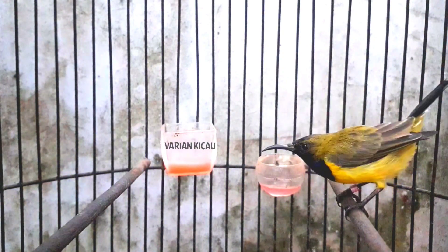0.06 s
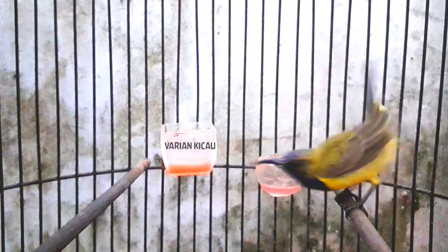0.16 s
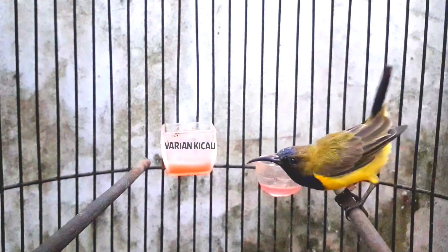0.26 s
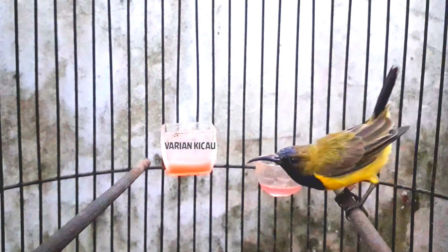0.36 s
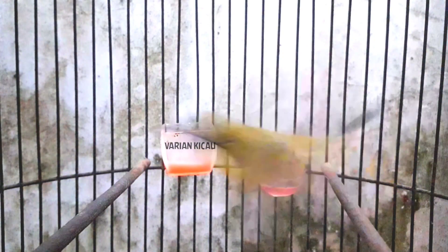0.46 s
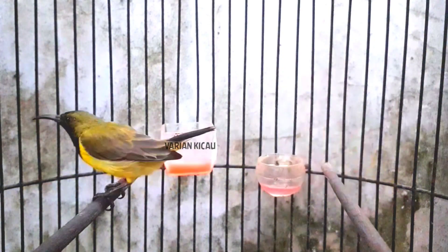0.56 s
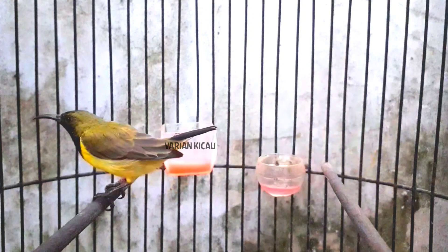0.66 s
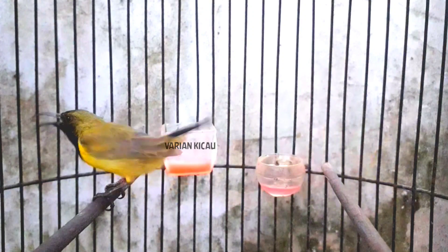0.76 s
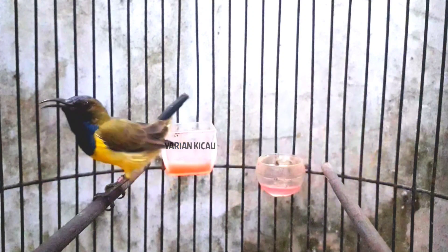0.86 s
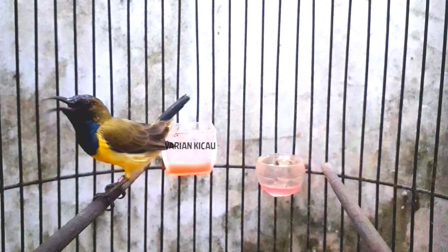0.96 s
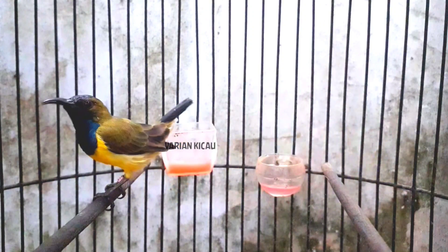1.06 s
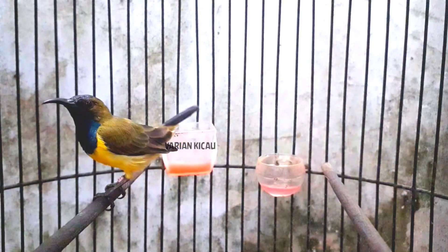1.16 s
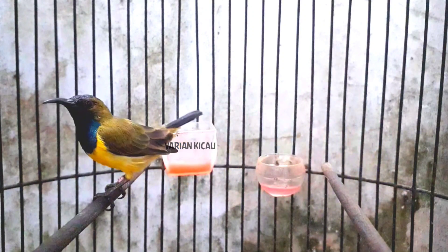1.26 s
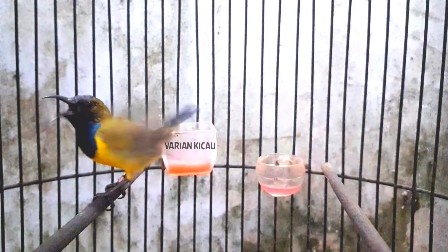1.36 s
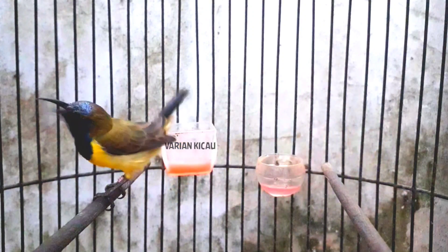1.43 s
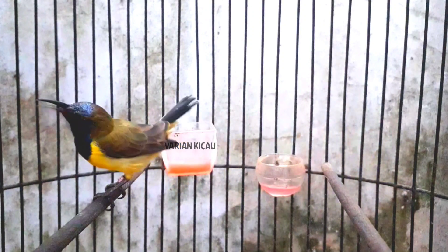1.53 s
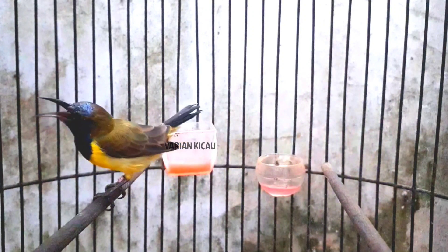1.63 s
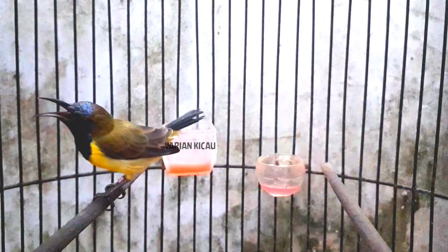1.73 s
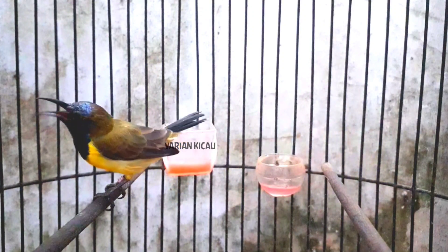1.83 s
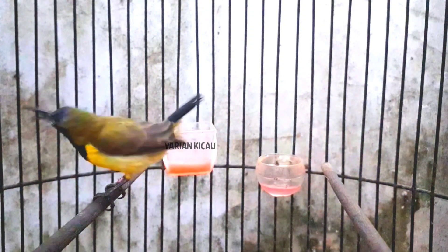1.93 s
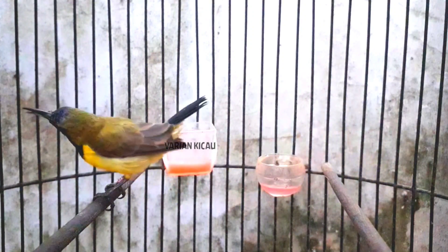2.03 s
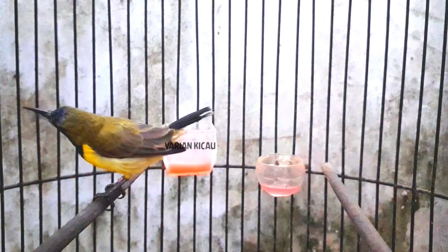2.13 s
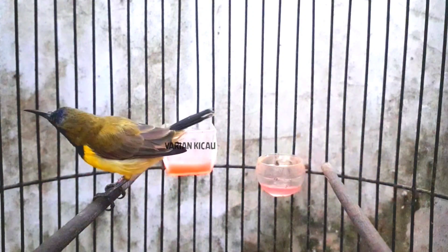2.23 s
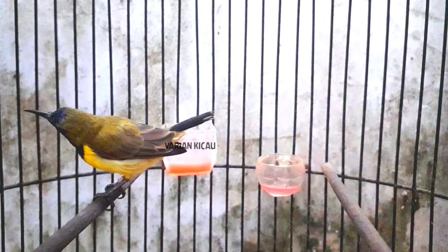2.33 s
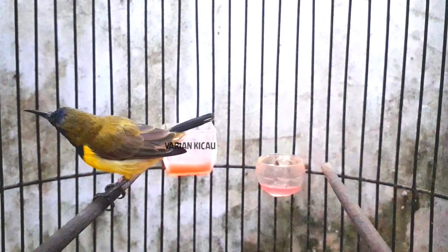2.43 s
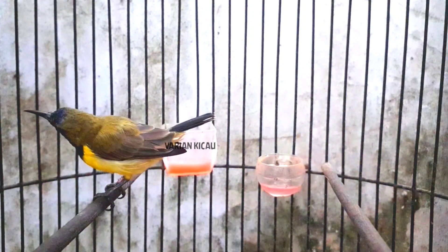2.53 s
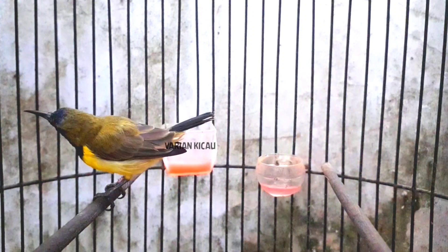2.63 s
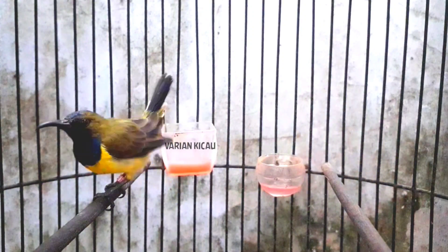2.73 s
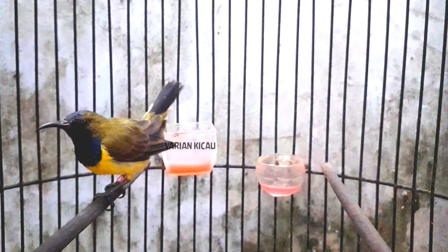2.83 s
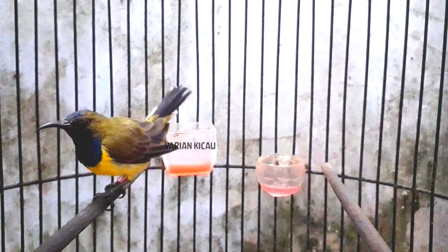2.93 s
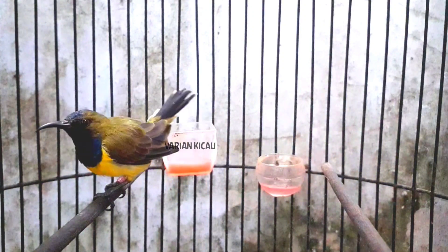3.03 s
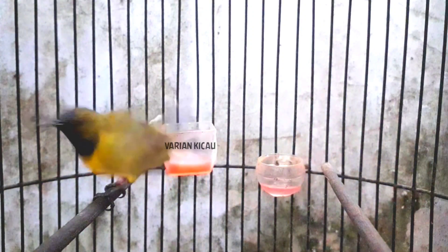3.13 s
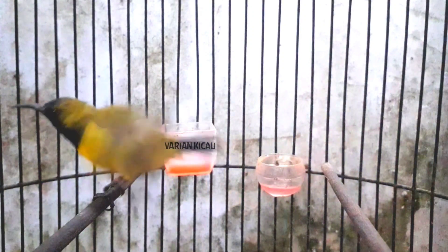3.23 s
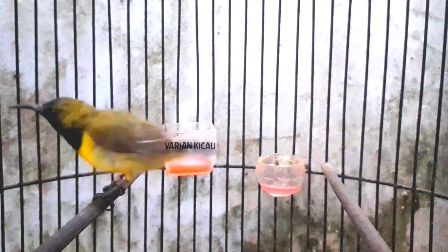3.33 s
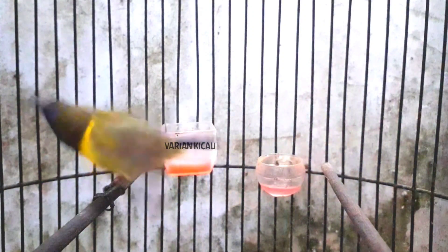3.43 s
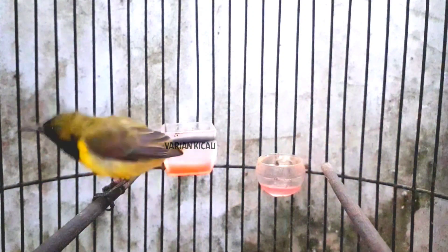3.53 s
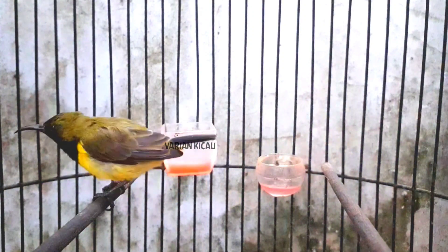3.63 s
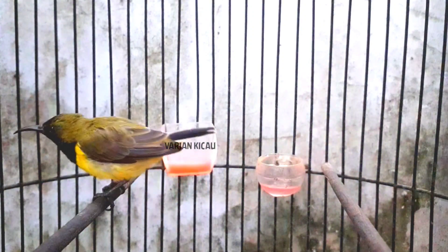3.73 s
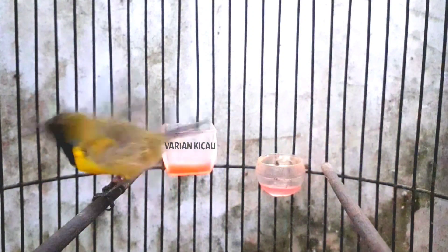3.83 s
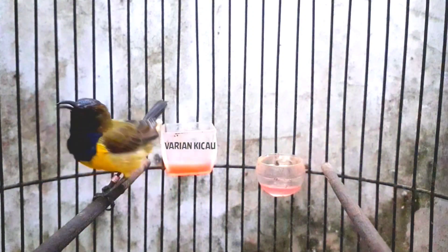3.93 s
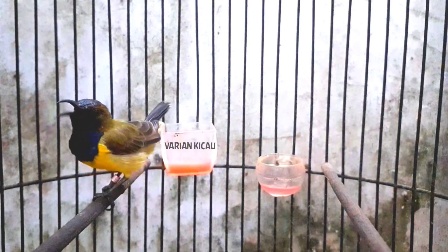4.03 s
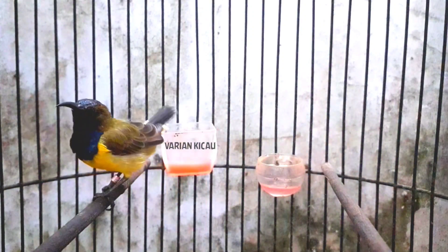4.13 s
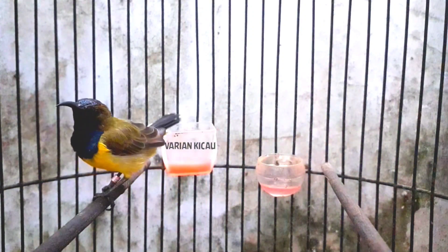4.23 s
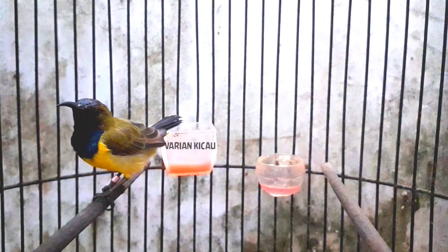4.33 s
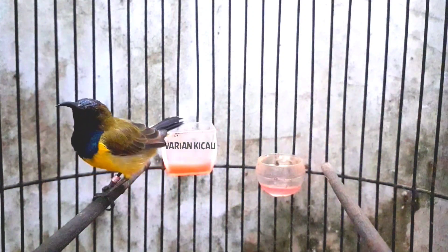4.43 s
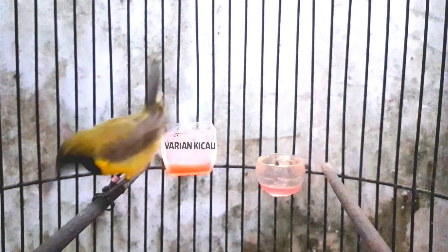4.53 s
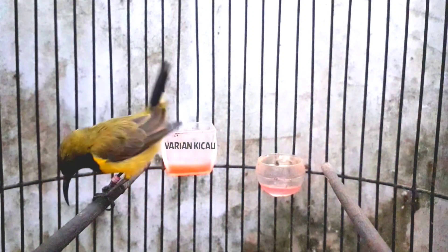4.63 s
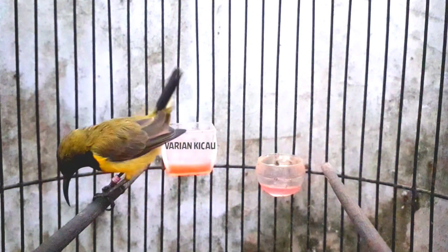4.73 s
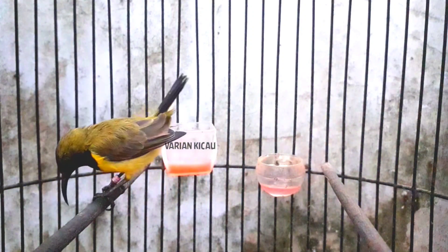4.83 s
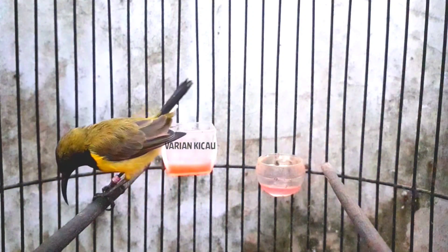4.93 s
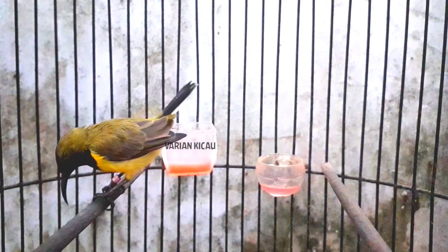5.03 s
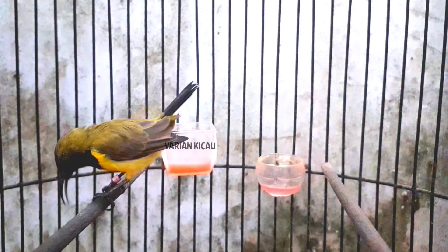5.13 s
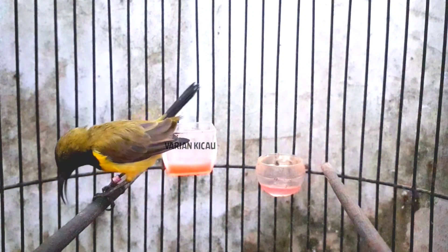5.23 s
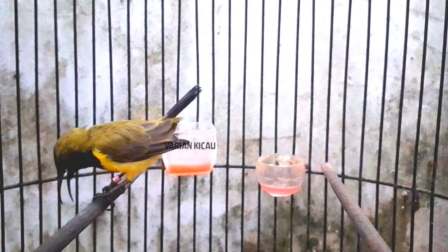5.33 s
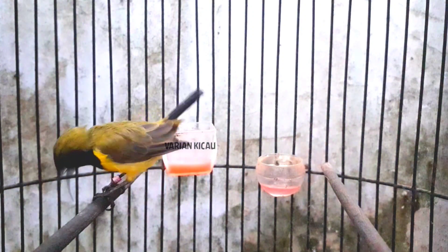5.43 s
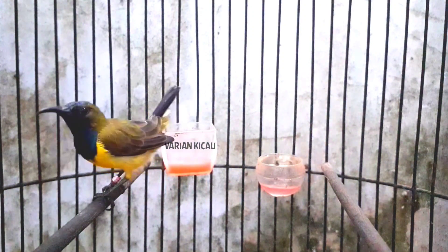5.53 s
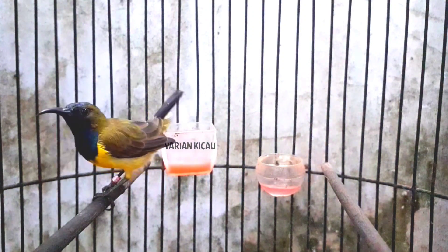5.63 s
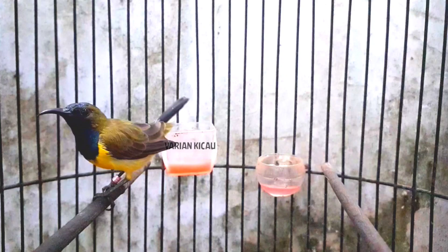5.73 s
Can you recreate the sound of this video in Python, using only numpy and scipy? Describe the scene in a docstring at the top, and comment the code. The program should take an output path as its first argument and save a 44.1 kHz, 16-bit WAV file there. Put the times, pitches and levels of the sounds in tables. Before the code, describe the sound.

Close, bright songbird phrases ring out left of centre: sharp chirp, arched whistles, rapid trill, closing chatter, over quiet yard air and distant birds.

```python
"""A small caged bird sings close to a pair of microphones, louder on the left: a chirp, two long arched
calls, a trill of seven double-arched notes and a burst of chatter. Other birds twitter farther off in
a walled yard, over murmuring air, a low wavering hum and a faint moan; two scraping strokes and two
perch knocks are heard. Birds are overtone series shaped by throat resonances, plus breath noise;
bodies are narrow noise bands, and cage and yard are delayed copies and sparse echoes."""
import sys
import numpy as np
from scipy import signal
from scipy.fft import rfft, irfft
from scipy.io import wavfile
from scipy.ndimage import uniform_filter1d, map_coordinates

SR = 44100
rng = np.random.default_rng(int(sys.argv[2]) if len(sys.argv) > 2 else 0)


def to_wav(sig):
    """Store sig (one row per channel, or 1-D mono) as 16-bit WAV at the path in sys.argv[1].

    Samples outside -1..1 are clipped; the rate is SR.
    """
    pcm = np.clip(np.atleast_2d(sig), -1, 1) * 32767
    pcm = np.round(pcm).astype(np.int16)
    wavfile.write(sys.argv[1], SR, pcm.T)  # frames by channels


N = 254456
EDGE_HZ = 15800  # upper limit of the overtones and of the whole sound

# relative colour of the near bird's throat and path: frequency_hz, gain_db
THROAT = [(1000, -25), (2100, -16.5), (3000, -16.5), (4300, -3.5), (6300, -5), (7500, -7.5), (8600, -10.5),
          (10800, -25.5), (13000, -24.5), (15000, -17)]


def amp(db):
    """Amplitude ratio of a level: 20 dB is a factor of ten."""
    return 10 ** (np.asarray(db) / 20)


def evened(x):
    """Normalizes to unit root-mean-square amplitude."""
    return x / np.sqrt(np.mean(abs(x) ** 2) + 1e-20)


def read(points, hz):
    """Interpolates a spectrum along logarithmic frequency."""
    f, value = np.transpose(points)
    return np.interp(np.log(hz + 1), np.log(f + 1), value)


def add(mix, s, sound):
    """Superposition: adds a sound into the mix from time s."""
    part = mix[round(max(s, 0) * SR):][:len(sound)]
    part += sound[:len(part)]


def coloured(x, points):
    """Linear filtering: scales each frequency by a table of (Hz, dB)."""
    hz = np.fft.rfftfreq(x.shape[-1], 1 / SR)
    return irfft(rfft(x) * amp(read(points, hz)), x.shape[-1])


def wander(length, width_hz):
    """Narrow-band noise: complex, of rms 1, changing about width_hz times a second."""
    pole = np.exp(-np.pi * width_hz / SR)
    settle = int(2 * SR / width_hz)
    z = rng.standard_normal(length + settle) + 1j * rng.standard_normal(length + settle)
    return evened(signal.lfilter([1], np.poly([pole, pole]), z)[settle:])


def yard(x, gap_s):
    """Diffuse reverberation: sparse random-sign echoes decay exponentially, separately for each side."""
    t60_s, spacing = 0.3, 20  # one echo in every 20 samples
    length = SR // 2
    taps = np.zeros((2, length))
    at = np.arange(0, length - spacing, spacing) + rng.integers(0, spacing, (2, (length - 1) // spacing))
    np.put_along_axis(taps, at, rng.choice([-1., 1.], at.shape), 1)
    t = np.arange(length) / SR
    tail = taps * amp(-60 * t / t60_s) * np.clip(t / gap_s, 0, 1)
    return signal.fftconvolve(x[None], tail / np.linalg.norm(tail[0]), axes=1)[:, :N]


def delayed(x, s, drift_s):
    """Propagation delay: a path whose length creeps to and fro, shifting the pitch slightly."""
    # drawn once in 64 samples, so it changes about 90 / 64 = 1.4 times a second
    late = s + drift_s * wander(N // 64 + 2, 90).real.repeat(64)[:N]
    return map_coordinates(x, [np.arange(N) - uniform_filter1d(late, 256) * SR], order=3)


def caged_bird():
    """Multipath propagation: the song is louder on the left; bars and walls answer."""
    # start_s, dip_s, end_s, first_top_hz, second_top_hz, first_level_db, second_level_db
    trill_rows = [(1.549, 1.585, 1.63, 1980, 2427, -18.5, -11),
                  (1.668, 1.701, 1.747, 2129, 2442, -11.5, -13.5),
                  (1.783, 1.822, 1.872, 2138, 2450, -15, -13), (1.905, 1.943, 1.988, 2211, 2403, -16, -14),
                  (2.028, 2.062, 2.110, 2184, 2550, -15.5, -13),
                  (2.16, 2.195, 2.237, 2162, 2412, -16.5, -13),
                  (2.287, 2.321, 2.36, 2142, 2358, -17.5, -11)]
    # one curve a call: time_s, pitch_hz, level_db, beak_resonance_hz
    call_curves = [
        [(.975, 1240, -44, 5160), (.996, 1241, -25.5, 5540), (1.012, 1334, -23, 7200), (1.034, 1351, -21, 6800),
         (1.038, 1446, -19.5, 5770), (1.074, 1407, -23.5, 5600), (1.082, 1522, -14, 5100),
         (1.105, 1733, -24, 4500), (1.135, 2050, -19, 3840), (1.165, 2104, -21, 5630),
         (1.205, 2128, -16.5, 6640), (1.235, 2052, -14, 6400), (1.255, 1870, -20.5, 4830),
         (1.27, 1540, -28, 4700)],
        [(4.052, 1126, -50.5, 5070), (4.07, 1215, -29, 5300), (4.12, 1451, -25.5, 4800),
         (4.135, 1568, -20.5, 4600), (4.155, 1723, -28.5, 4170), (4.178, 2033, -20, 3800),
         (4.19, 2080, -33, 4120), (4.208, 2167, -17.5, 4150), (4.24, 2100, -28, 5460), (4.272, 2191, -18, 6050),
         (4.29, 2074, -16.5, 6700), (4.312, 1920, -20, 5000), (4.335, 1572, -32, 4520)],
    ]
    # time scale of the rough onset of each call: rough_s
    onset_times = [.03, .08]
    # start_warble, end_warble, overtone_fall_db, beak_hz, curve of (time_s, pitch_hz, level_db)
    chirp_rows = [(0.04, 0.27, 43, 6200, [(.739, 4080, -45), (.747, 6320, -20), (.754, 4165, -39),
                  (.760, 6300, -17.5), (.765, 5040, -18.5), (.770, 6140, -16.5), (.78, 5960, -16.5),
                  (.789, 4440, -17.5)]), (0.14, 0.13, 28, 7330, [(1.533, 8000, -42), (1.545, 7660, -37),
                  (1.558, 8230, -19)]), (0.73, 0.0086, 4.6, 8250, [(5.298, 1544, -39), (5.308, 1946, -29.5),
                  (5.322, 2284, -26.5), (5.335, 2113, -22.5), (5.35, 1803, -23), (5.365, 1457, -35.5)]),
                  (0.079, 0.05, 2.5, 4190, [(5.413, 2160, -41), (5.422, 2856, -27), (5.431, 3600, -29.5),
                  (5.439, 3060, -25.5)]), (0.79, 0.81, 4.94, 8440, [(5.51, 1678, -58), (5.522, 1888, -27),
                  (5.548, 2300, -26.5), (5.575, 1927, -25), (5.599, 1485, -32.5)]),
                  (0.41, 0.05, 6.8, 5300, [(5.648, 1290, -29), (5.662, 2746, -20.5), (5.68, 2840, -23),
                  (5.695, 3510, -27), (5.706, 2495, -15.5), (5.716, 1874, -23), (5.727, 1460, -27)])]
    # paths by bars and wall, left then right: delay_s, gain, drift_s as the bird shifts
    paths = [
        [(0, 1, 0.0022), (.0021, -0.037, 0.0098), (.0057, -0.32, 0)],
        [(0, 0.75, 0.00069), (.00145, .75, 0.0018), (.0030, 0.38, 0.003), (.0065, 0.5, 0.0043)],
    ]
    # spectral lead of the left side: frequency_hz, left_minus_right_db
    left_lead = [(1000, 2.5), (2400, 2.5), (4400, 4.5), (8000, 9.5), (12000, -2)]
    # the head turns: time_s, level_db added to the left lead
    facing = [(.7, -1), (1.199, 0.5), (2.3, 1), (4.197, 0.5), (5.502, -1)]

    song = np.zeros(N)
    notes = [trill_note(*row) for row in trill_rows]
    notes += [long_call(*row) for row in zip(call_curves, onset_times)]
    notes += [chirp(*row) for row in chirp_rows]
    for note in notes:
        add(song, *note)
    left, right = (sum(gain * delayed(song, s, drift_s) for s, gain, drift_s in side) for side in paths)
    right = coloured(right, [(f, -db) for f, db in left_lead])
    right = right / amp(np.interp(np.arange(N) / SR, *np.transpose(facing)))
    return np.array([left, right]) + amp([[-12], [-13]]) * yard(song, gap_s=0.00099)


def trill_note(start, dip, end, first_hz, second_hz, first_db, second_db):
    """Frequency modulation: pitch arches twice, clean on the tops, weak and rough in the dip."""
    first_top_s, last_top_s = 0.0152, 0.021  # distance of the tops from the start and the end
    dip_share = .76  # pitch in the dip, as a share of the first top
    wobble = .008  # unsteadiness of pitch, as a share
    t = np.arange(start, end, 1 / SR)
    # 0 on the tops, -1 in the dip, 1 at both ends
    off = np.interp(t, [start, start + first_top_s, dip, end - last_top_s, end], [1, 0, -1, 0, 1])
    first = t < dip
    top_hz = np.where(first, first_hz, second_hz)
    foot_hz = np.where(off < 0, dip_share * first_hz, top_hz * np.where(first, .76, .74))
    low = abs(off) ** np.where(off < 0, 1.8, 2.3)
    hz = (top_hz + (foot_hz - top_hz) * low) * (1 + wobble * wander(len(t), 150).real)
    db = np.interp(t, [start, end], [first_db, second_db]) - 6 * low
    rough = .045 + .8 * low
    return start, sing(hz, db, rough, THROAT, beak_hz=np.where(first, 6100, 7200))


def long_call(rows, rough_s):
    """Source and filter: a rough onset clears into a pure arch under a moving beak resonance."""
    onset_rough, low_rough, fray_rough = .8, 0.055, 0.45
    pure_hz = 1920  # above this pitch the low-pitch roughness is gone
    fray_s = 0.027  # the end frays over this time
    s, hz, db, beak_hz = np.transpose(rows)
    t = np.arange(s[0], s[-1], 1 / SR)
    hz = uniform_filter1d(np.interp(t, s, hz), 200)
    rough = onset_rough * np.exp(-((t - s[0]) / rough_s) ** 4)
    rough += low_rough * np.clip((pure_hz - hz) / 200, 0, 1)
    rough += fray_rough * np.clip(1 - (s[-1] - t) / fray_s, 0, 1) ** 2
    beak_hz = np.interp(t, s, beak_hz)
    return s[0], sing(hz, np.interp(t, s, db), rough, THROAT, fall_db=1, beak_hz=beak_hz)


def chirp(warble, end_warble, fall_db, beak_hz, rows):
    """Vibrato with a gliding depth: a short near note whose warble moves from one depth to another."""
    s, hz, db = np.transpose(rows)
    t = np.arange(s[0], s[-1], 1 / SR)
    depth = np.interp(t, s[[0, -1]], [warble, end_warble])
    hz = uniform_filter1d(np.interp(t, s, hz), 100, mode="nearest")
    hz, db = warbled(hz, np.interp(t, s, db), depth, warble_hz=99.6)
    rough = .14 + .12 * abs(depth)
    return s[0], sing(hz, db, rough, THROAT, fall_db, beak_hz, rise_s=0.002, smear_hz=701.5)


def warbled(hz, db, warble, warble_hz):
    """Joint frequency and amplitude modulation: a warble rocks pitch and level together."""
    rock = warble * np.sin(2 * np.pi * (warble_hz * np.arange(len(hz)) / SR - .25))
    return hz * (1 + 0.13 * rock), db + 7 * rock


def sing(hz, db, rough, throat, fall_db=0, beak_hz=None, rise_s=0.0052, smear_hz=800):
    """Source-filter voice: syrinx overtones pass throat and beak; roughness smears them and leaks air."""
    # air rushing past the syrinx, relative density: frequency_hz, density_db_per_hz
    breath_spectrum = [(100, -24.5), (400, -24.5), (900, -35), (2000, -12.5), (3000, -20.5), (5500, -4),
                       (8500, -11), (11000, -25), (15500, -28)]
    order = np.arange(1, EDGE_HZ // hz.min() + 1)[:, None]
    colour_db = read(throat, order * hz) - fall_db * (order - 1)
    if beak_hz is not None:
        octaves_off = np.log2(order * hz / beak_hz)
        colour_db = colour_db + 14 * np.exp(-(octaves_off / 0.44) ** 2)
    gains = amp(colour_db) * (order * hz < EDGE_HZ)
    gains = gains / np.sqrt((gains ** 2).sum(0) / 2)  # the overtones together have rms 1
    rough = np.clip(rough, 0, 1)
    clean = (1 - rough) ** np.sqrt(order * hz / 5000)  # high overtones smear most
    noise = np.array([wander(len(hz), smear_hz) for _ in order])
    smear = np.sqrt(clean) + np.sqrt(1 - clean) * noise
    phase = 2 * np.pi * order * np.cumsum(hz) / SR
    tones = (gains * smear * np.exp(1j * phase)).imag.sum(0)
    breath = evened(coloured(rng.standard_normal(len(hz)), breath_spectrum))
    breath = amp(-7.5) * np.sqrt(rough) * breath
    t = np.arange(len(hz)) / SR
    fade = np.minimum(t / rise_s, t[::-1] / 0.0041)
    return amp(db) * (tones + breath) * np.sin(np.pi / 2 * np.minimum(fade, 1)) ** 2


def far_birds():
    """Distance loss: dulled twitter from the right; sliding notes, deeper in the yard, echo more."""
    # buzzy notes, nearly level: start_s, length_s, pitch_hz, level_db, roughness (clipped to 1), warble
    buzz_rows = [(.01, 0.034, 2865, -60.5, 0.3, 0.15), (.268, .064, 1880, -56, 1.17, 0.14),
                 (.366, 0.03, 1807, -55, 0.65, 0.68), (0.433, 0.035, 2840, -58, .25, 0.27),
                 (0.452, 0.06, 1747, -55, .4, 0.57), (0.694, 0.046, 2800, -58.5, 0.5, .25),
                 (2.662, 0.048, 1685, -51, 0.77, 0.55), (2.744, 0.058, 1778, -51.5, 0.77, 0.57),
                 (2.838, .057, 1790, -52, 0.33, .06), (2.931, 0.037, 1814, -54.5, 0.65, 0.46),
                 (3.075, 0.065, 1855, -53.5, 0.42, 0.02), (3.185, 0.048, 1737, -55.5, 0.9, 0.4),
                 (3.359, 0.018, 1840, -56, 0.3, 0.04), (3.434, 0.0585, 1775, -57.5, 0.65, 0.28),
                 (3.545, 0.012, 1880, -57, 0.34, 0.15), (4.698, 0.054, 2180, -57.5, 1.08, 0.2),
                 (5.243, 0.16, 1583, -53.5, 0.8, 0.69)]
    # sliding notes: start_s, length_s, start_hz, middle_hz, end_hz, level_db, roughness (clipped to 1)
    slide_rows = [(0, 0.043, 5800, 4920, 3390, -55, 0.64), (0.089, 0.057, 5000, 5550, 5920, -58, .6),
                  (0.146, 0.057, 4640, 5720, 5640, -62.5, 0.7),
                  (0.247, 0.074, 8000, 7200, 6900, -53.5, 0.54), (0.51, 0.035, 3790, 3610, 3750, -60.5, .4),
                  (0.575, 0.11, 5690, 4770, 4067, -60, 1.2), (0.899, 0.088, 2890, 3675, 4540, -49.5, 1),
                  (2.515, 0.046, 2715, 3650, 2347, -57, .4), (2.973, 0.067, 4800, 5670, 5640, -51.5, 0.37),
                  (3.277, 0.028, 1583, 1820, 1920, -49.5, .1), (3.306, 0.05, 2120, 2305, 1890, -59.5, 0.14),
                  (3.678, .082, 6320, 4600, 3677, -66, .35), (4.423, .068, 4980, 5260, 4640, -56, 0.4),
                  (4.452, 0.12, 2995, 3830, 4475, -52, 0.72), (4.571, 0.043, 4700, 5660, 7360, -52.5, 0.4),
                  (4.592, 0.055, 6300, 5300, 4440, -50.5, 0.6), (4.805, .038, 1472, 1668, 1780, -52, 0.3),
                  (4.846, 0.05, 2390, 2220, 1898, -56.5, 0.65), (5.012, 0.04, 2505, 2870, 2254, -59, 0.6)]
    # colour of the distance: frequency_hz, gain_db
    dulling = [(9000, 3), (13000, -9.5)]
    sag = .04  # pitch of a buzz falls by this share over the note
    buzzes, slides = np.zeros((2, N))
    for s, length, hz, *rest in buzz_rows:
        curve_hz = hz * (1 + sag / 2), hz, hz * (1 - sag / 2)
        add(buzzes, *far_note(s, length, *curve_hz, *rest, rise_s=.008, smear_hz=330))
    for row in slide_rows:
        add(slides, *far_note(*row, warble=0.11, rise_s=.009, smear_hz=600))
    echo = yard(coloured(amp(-8) * buzzes + amp(-5) * slides, dulling), gap_s=.006)
    return coloured(buzzes + slides, dulling) * amp([[-4], [0]]) + echo


def far_note(s, length, start_hz, middle_hz, end_hz, db, rough, warble, rise_s, smear_hz):
    """Frequency glide: a warbled parabola of pitch, with weaker overtones on higher notes."""
    # relative colour of a far throat and its path: frequency_hz, gain_db
    far_colour = [(1500, -27), (2800, 7.5), (3700, 1), (5400, 8.5), (6800, 5.5), (8500, -28),
                  (11000, -63.5), (15000, -64)]
    t = np.arange(0, length, 1 / SR)
    parabola = np.polyfit([0, length / 2, length], [start_hz, middle_hz, end_hz], 2)
    hz, db = warbled(np.polyval(parabola, t), db, warble, warble_hz=91.5)
    fall_db = 2.5 + 4 * np.log2(middle_hz / 1737)  # 4 dB more for each octave over 1737 Hz
    return s, sing(hz, db, rough, far_colour, fall_db, rise_s=rise_s, smear_hz=smear_hz)


def scrape():
    """Friction excitation: rubbing noise rings the resonances of a hollow wooden body."""
    # strokes: start_s, length_s, level_db at the start
    strokes = [(3.358, 0.285, -54), (3.654, 0.16, -58)]
    # body resonances: frequency_hz, width_hz, relative_level_db
    body = [(498, 47.8, -2.5), (1100, 129, -10), (1860, 53, -19), (2130, 25, -38)]
    rub_colour = [(120, 3), (250, 0.5), (700, -9.5), (1500, -24.5), (8000, -19.5), (12000, -32)]  # Hz, dB
    out = np.zeros((2, N))
    for s, length, db in strokes:
        t = np.arange(0, length, 1 / SR)
        level_db = db - 6 * t / length + 2.7 * wander(len(t), 14.1).real
        stroke = amp(level_db) * signal.windows.tukey(len(t), .25)
        for side in out:
            rings = sum(amp(g) * (wander(len(t), w) * np.exp(2j * np.pi * f * t)).real for f, w, g in body)
            rub = coloured(rng.standard_normal(len(t)), rub_colour)
            add(side, s, stroke * (evened(rings) + amp(2) * evened(rub)))
    return out


def perch():
    """Impact and modal decay: feet land with a dull thud, and perch and bars rattle on."""
    # landings: time_s, level_db, ring_db relative to it
    knocks = [(0.686, -43, -20), (0.774, -41, 0.8)]
    # modes of perch and bars: frequency_hz, relative_level_db, t60_s
    modes = [(135.6, -4.5, 0.98), (474, -10, 0.28), (1084, -7.5, 0.35)]
    out = np.zeros(N)
    t = np.arange(0, .3, 1 / SR)
    for s, db, ring_db in knocks:
        thud = amp(-60 * t / 0.23) * (wander(len(t), 230) * np.exp(2j * np.pi * 260 * t)).real
        ring = 0
        for f, g, t60 in modes:
            ring = ring + amp(g - 60 * t / t60) * (wander(len(t), 63) * np.exp(2j * np.pi * f * t)).real
        add(out, s, amp(db) * np.minimum(t / 0.0043, 1) * (amp(ring_db) * ring + amp(-6) * thud))
    return out * amp([[-2.5], [2.5]])


def moan():
    """Narrow-band noise on a gliding centre: a faint far whistle, fuzzy, barely over the air."""
    # time_s, pitch_hz, level_db
    glide = [(4.15, 793, -79), (4.27, 800, -66), (4.4, 818, -85), (4.701, 830, -86), (4.879, 804, -70),
             (5.06, 639, -73), (5.1, 624, -92)]
    s, hz, db = np.transpose(glide)
    t = np.arange(s[0], s[-1], 1 / SR)
    out = np.zeros(N)
    tone = wander(len(t), 64) * np.exp(2j * np.pi * np.cumsum(np.interp(t, s, hz)) / SR)
    add(out, s[0], amp(np.interp(t, s, db)) * tone.real)
    return out


def hum():
    """Random amplitude and phase modulation: a low fuzzy tone that wavers in level."""
    # time_s, level_db
    swell = [(0.0, -64), (0.39, -55.5), (0.45, -60.5), (2.17, -67), (3.1, -52.5), (3.16, -66),
             (3.34, -46.5), (3.95, -71), (4.55, -56), (4.61, -83), (4.77, -53), (5.0, -59.5), (5.14, -50.5),
             (5.32, -62), (5.56, -46.5), (5.77, -49.5)]
    hum_hz = 96
    t = np.arange(N) / SR
    tone = (.7 + 0.72 * wander(N, 25)) * np.exp(2j * np.pi * hum_hz * t)
    return amp(np.interp(t, *np.transpose(swell))) * evened(tone.real) * amp([[-.7], [.7]])


def air():
    """Partly coherent noise: outdoor murmur from random short-time spectra with drifting patches."""
    # relative spectral density: frequency_hz, density_db_per_hz
    air_spectrum = [(12, -63.5), (20, -32.5), (101, 6.5), (168, -5.5), (228, -13), (388, -15), (949, -33),
                    (1910, -20), (2600, -19.5), (3740, -21.5), (5230, -26.5), (10200, -30), (14300, -49.5),
                    (16000, -63)]
    # likeness of the two sides: frequency_hz, left_right_correlation
    likeness = [(60, 0.73), (130, 0.95), (290, 0.59), (900, 0.47), (1500, 0), (3000, 0.022), (15000, 0)]
    level_db = -58
    frames, hz = N // 256 + 5, np.fft.rfftfreq(1024, 1 / SR)
    a, b, c, d, patches = rng.standard_normal((frames, 513, 5)).T
    patches = evened(uniform_filter1d(uniform_filter1d(patches, 20, 0), 16, 1))
    same = np.clip(read(likeness, hz), -1, 1)[:, None]
    left = a + 1j * b
    right = same * left + np.sqrt(1 - same ** 2) * (c + 1j * d)
    spectra = np.array([left, right]) * amp(read(air_spectrum, hz)[:, None] + 2.14 * patches)
    return amp(level_db) * evened(signal.istft(spectra, nperseg=1024, noverlap=768)[1][:, :N])


def scene():
    """Superposition of all sources, left and right."""
    return caged_bird() + far_birds() + scrape() + perch() + moan() + hum() + air()


def record(dry):
    """Band limiting: a linear-phase low-pass removes what lies above EDGE_HZ."""
    low_pass = signal.firwin(511, EDGE_HZ, window=("kaiser", 9), fs=SR)
    return signal.oaconvolve(dry, low_pass[None], "same")


dry = scene()
out = record(dry)
to_wav(out)
```